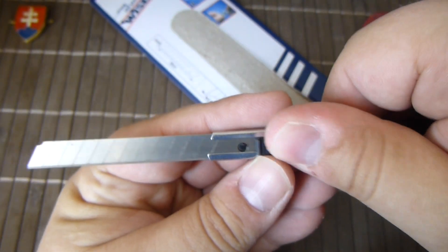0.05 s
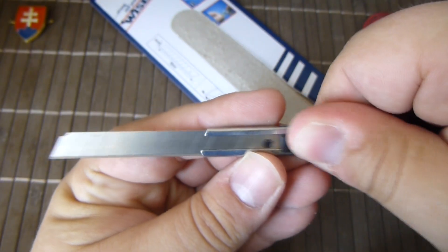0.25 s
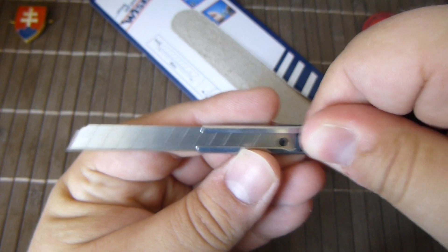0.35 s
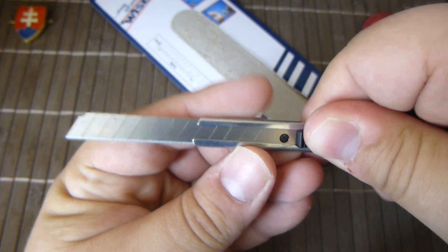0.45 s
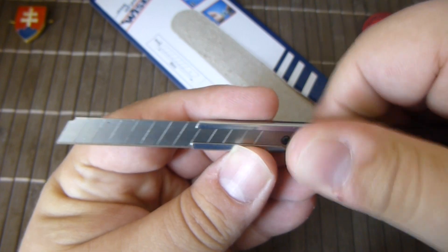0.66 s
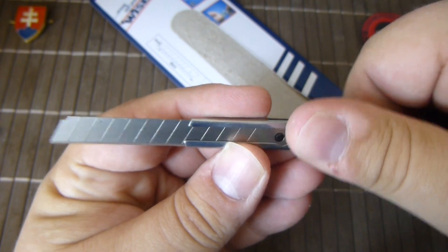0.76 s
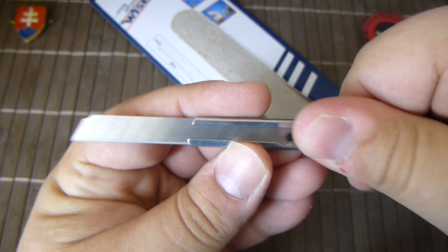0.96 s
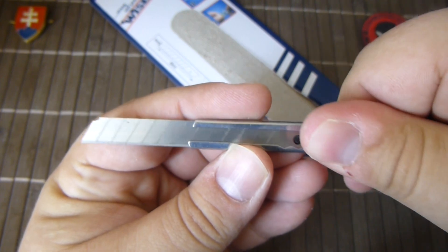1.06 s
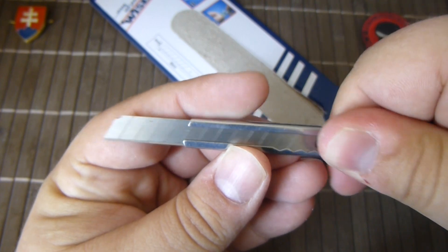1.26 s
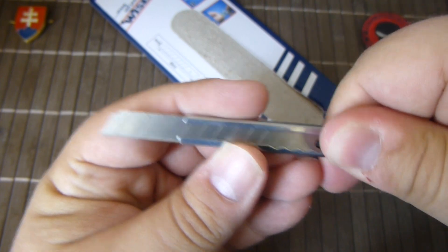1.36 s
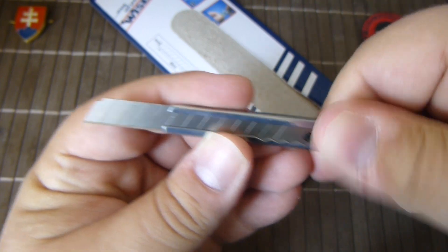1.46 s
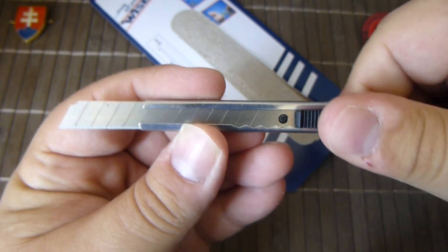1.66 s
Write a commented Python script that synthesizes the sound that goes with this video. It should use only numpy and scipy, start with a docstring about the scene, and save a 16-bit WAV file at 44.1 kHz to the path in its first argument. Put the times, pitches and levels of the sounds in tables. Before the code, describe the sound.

A utility knife blade is drawn back, clicking close to the microphone. After a light tick, four sharp snaps come between 0.2 and 0.5 seconds, each ringing briefly like thin steel and slightly overloading. Following a pause, three more land from about 1.05 to 1.3 seconds, then a soft settling tap. The blade scrapes and squeaks faintly during both runs, over a small room's low rumble and hum.

```python
"""Utility knife drawn back

A thumb draws back the slider of a snap-off knife, close to the microphone in a small room.
Its spring drops into seven notches, four then three; each snap rings the steel sleeve and blade
and overloads the microphone. The blade scrapes and squeaks faintly, over low room rumble and hum."""
import sys
import numpy as np
from scipy import signal
from scipy.fft import rfft, irfft
from scipy.io import wavfile
from scipy.ndimage import uniform_filter1d

SR = 44100
rng = np.random.default_rng(int(sys.argv[2]) if len(sys.argv) > 2 else 0)


def inscribe(sig):
    """Save sig as 16-bit PCM at rate SR to the path in sys.argv[1].

    A 1-D sig is mono; a 2-D sig holds one channel per row.
    Samples are clipped to [-1, 1] before scaling.
    """
    pcm = np.round(np.clip(np.atleast_2d(sig).T, -1, 1) * 32767)
    wavfile.write(sys.argv[1], SR, pcm.astype(np.int16))


N = 74970

# Room noise: spectrum, treble roll-off, side-channel gain. Each row: frequency in Hz, gain in dB.
AIR_SPECTRUM = [(15, -56.5), (25, -17), (69, -13), (86, -26.5), (101, -12), (122, -1.5), (156, -14),
                (209, 0), (313, -3.5), (368, -7), (399, -13), (537, -9.5), (871, -13.5), (1140, -18),
                (1710, -20), (2230, -27), (15500, -36.5)]
AIR_ROLLOFF = [(15500, 3), (16300, -19)]
AIR_SIDE_GAIN = [(30, -6.5), (120, -12), (280, -12), (600, -5), (1200, 0.5), (4000, -1), (15000, -8)]
# Room noise envelope. Each row: time in seconds, level in dB.
AIR_ENVELOPE = [(0, -55.5), (.4, -56.5), (.8, -58.5), (1.25, -59), (1.7, -61.5)]
# Near surfaces. Each row: delay in seconds, gain in dB.
REFLECTIONS = [(.006, -30), (.0095, -26), (0.0211, -33)]
# Reverb colour and treble roll-off. Each row: frequency in Hz, gain in dB.
REVERB_SPECTRUM = [(2000, 5.5), (6000, -1), (9500, -3.5), (13000, -3), (15000, -2.5)]
REVERB_ROLLOFF = [(15200, 0), (16600, -25)]
# Blade squeaks. Each row: centre in seconds, length in seconds, frequency in Hz, level in dB.
BLADE_SQUEAKS = [(.095, .07, 4400, -71.5), (.18, .045, 7340, -64), (0.409, .1, 3820, -57.5),
                 (1.145, 0.045, 7070, -70), (1.25, .06, 5460, -69), (1.295, .06, 3290, -68)]
# Blade travel. Each row: start in seconds, end in seconds, level in dB.
BLADE_SLIDES = [(.09, 0.22, -55), (0.322, 0.456, -54), (0.952, 1.068, -57), (1.15, 1.314, -56)]
# Scrape and settling-tap resonances. Each row: frequency in Hz, width in Hz, gain in dB.
SCRAPE_MODES = [(3193, 680, -1.5), (3790, 290, 3.5), (5800, 340, 2), (7500, 790, 0), (9300, 2200, -9),
                (12480, 3500, -11)]
SETTLE_MODES = [(1970, 120, 0), (2800, 400, -11), (4700, 200, -9), (5825, 200, -4)]
# Light slider catches. Each row: start in seconds, level in dB, treble gain in dB.
CATCHES = [(.120, -39, 0), (0.138, -28.5, 3.5), (0.572, -36, -28), (0.996, -40, 3), (1.011, -37.5, 4)]
# Slider catch, handle knock, plastic clack. Each row: frequency in Hz, gain in dB.
CATCH_SPECTRUM = [(1500, -27), (4000, -11), (6500, 6), (9000, 1.5), (15000, -13.5), (17000, -26.5)]
KNOCK_SPECTRUM = [(60, -24), (150, -9.5), (250, 0.5), (450, 5), (700, -5.5), (1100, -36), (2500, -31)]
CLACK_SPECTRUM = [(100, -12.5), (500, -1.5), (1200, -14.5), (3000, -1), (9000, 11), (14500, 1),
                  (17500, -11)]
# Sleeve and blade. Each row: frequency in Hz, width in Hz, gain in dB with blade out, with blade in.
STEEL_MODES = [(1864, 180, -12.5, -4), (2177, 89, -3.5, -3.5), (2850, 260, 2, -15), (3203, 160, -1, 10.5),
               (3754, 230, 4.5, 0), (4700, 200, 7, 6.5), (5261, 267, 12.5, 9), (5960, 400, 10, 5),
               (6543, 190, 14, 3.5), (7470, 1100, 10, 4.5), (8430, 240, 15, 10.5), (9006, 390, 20, 23),
               (9580, 420, 17.5, 19), (10530, 280, 18.5, 17), (10970, 83, 17.5, 15), (11460, 350, 19, 18),
               (12140, 420, 11.5, 16.5), (13500, 1200, 12, 11.5), (13540, 1700, 10.5, 4),
               (14170, 400, 4.5, 10.5), (16400, 110, 10, 3.5)]
# Notch snaps. Each row: start in seconds, level in dB, blade retraction from 0 to 1, trims in dB for
# knock, clack and the low, middle, ring and top bands, rebound delay in seconds, rebound gain in dB,
# rattle trim in dB, room send in dB.
NOTCHES = [(.2164, 1.5, 0.26, -0.5, -12.5, -0.5, 4.5, -3, -3, .0011, -3.5, -4.5, 0),
           (0.3172, 0, 0.03, -4, -16, -2, -1, 5, -4, .0005, -4.5, -3, 2.5),
           (0.3727, 1, 0.1, -22, -12, 0, -1, -1.5, -1.5, .0007, -7, -2.5, 0),
           (.4518, -1, .0, -39, -12, 4, -1, 0.5, 0.5, .0006, -10, 0, 1.5),
           (1.0531, -3, 1, -9, -5, -8, 1, 0, 6, .0005, 0.5, 3, 2.5),
           (1.2058, -2, 0.89, -13, -19.5, 0.5, -0.5, 1.5, -4, .0004, -2, 0.5, 1.5),
           (1.3127, 0.5, 0.99, -18, -14.5, -1.5, -1.5, -5.5, 3, .0006, -4, -2, 3)]

LOW_HZ, MIDDLE_HZ, RING_HZ, TOP_HZ = 3000, 6000, 9150, 13600
LOW_OCT, MIDDLE_OCT, RING_OCT, TOP_OCT = 0.48, 0.81, 0.083, 0.062
CRACK_DECAY_S, RATTLE_DECAY_S, KNOCK_DECAY_S, TICK_DECAY_S = 0.00057, 0.0021, 0.0024, 0.0069
RATTLE_BASE_DB, KNOCK_BASE_DB = -3.5, -0.5
CHATTER_SIDE = 0.42


def undb(db):
    """Decibels to gain."""
    return 10 ** (np.asarray(db) / 20)


def bin_hz():
    """FFT bin frequencies, offset 1 Hz to keep logs finite."""
    return np.arange(N // 2 + 1) * SR / N + 1


def curve(points):
    """Gain per bin from (Hz, dB) points."""
    hz, db = np.array(points, float).T
    return undb(np.interp(np.log(bin_hz()), np.log(hz), db))


def resonances(modes):
    """Gain per bin of steep-sided (Hz, width in Hz, dB) peaks."""
    freq_hz = bin_hz()
    peaks = (undb(db) / (1 + 2 * ((freq_hz - hz) / width_hz) ** 2) for hz, width_hz, db in modes)
    return np.sqrt(sum(peak ** 2 for peak in peaks))


def colour(x, gain):
    """Minimum-phase filter with the given gain per bin."""
    cepstrum = irfft(np.log(gain), N)
    cepstrum[1:N // 2] *= 2
    cepstrum[N // 2 + 1:] = 0
    return irfft(rfft(x) * np.exp(rfft(cepstrum)), N)


def whiten(x, smooth_hz=161.2):
    """Flatten the smoothed spectrum."""
    power = uniform_filter1d(np.abs(rfft(x)) ** 2, size=int(smooth_hz * N / SR) + 1)
    return colour(x, 1 / np.sqrt(np.abs(power) + 1e-9))


def delay(x, delay_s):
    """Shift later, keeping N samples."""
    shift = int(np.clip(round(delay_s * SR), 0, N - 1))
    return np.concatenate([np.zeros(x.shape[:-1] + (shift,)), x[..., :N - shift]], axis=-1)


def antiphase(x):
    """Stereo side signal: plus left, minus right."""
    return x * np.array([[1], [-1]])


def burst(decay_s):
    """Decaying noise of unit energy."""
    x = rng.standard_normal(N) * np.exp(-np.arange(N) / SR / decay_s)
    return x / np.sqrt(np.sum(x ** 2))


def impact(decay_s):
    """Brief rough contact with a flat spectrum."""
    return whiten(burst(decay_s))


def background(hum_hz=121, hum_db=-73):
    """Room rumble, thin hiss and mains hum."""
    t = np.arange(N) / SR
    mid, side = colour(rng.standard_normal((2, N)), curve(AIR_SPECTRUM) * curve(AIR_ROLLOFF))
    air = (mid + antiphase(colour(side, curve(AIR_SIDE_GAIN)))) / np.std(mid)
    envelope = undb(np.interp(t, *np.array(AIR_ENVELOPE).T))
    return air * envelope + undb(hum_db) * np.sin(2 * np.pi * hum_hz * t)


def room(x, early_db=-18, early_t60_s=0.055, late_db=-21, late_t60_s=0.15, predelay_s=0.0034, side=0.45):
    """Echoes off near surfaces and a short two-slope tail."""
    tail = np.zeros((2, N))
    for db, t60_s in ((early_db, early_t60_s), (late_db, late_t60_s)):
        decay_s = t60_s / np.log(1000)
        tail += undb(db) * (impact(decay_s) + side * antiphase(burst(decay_s)))
    reverb = signal.fftconvolve(x[None], delay(tail, predelay_s), axes=1)[:, :N]
    echoes = sum(undb(db) * delay(x, delay_s) for delay_s, db in REFLECTIONS)
    return colour(reverb + echoes, curve(REVERB_SPECTRUM) * curve(REVERB_ROLLOFF))


def friction(spread_db=3.5, grain_samples=100):
    """Stick and slip: noise with a random level per grain."""
    grain_db = spread_db * rng.standard_normal(N // grain_samples + 1)
    return undb(np.repeat(grain_db, grain_samples)[:N]) * rng.standard_normal(N)


def squeaks(width_hz=650):
    """Friction briefly holds one blade resonance."""
    t, out = np.arange(N) / SR, np.zeros(N)
    for centre_s, length_s, hz, db in BLADE_SQUEAKS:
        tone = colour(friction(), resonances([(hz, width_hz, 0)]))
        envelope = np.exp(-(2 * (t - centre_s) / length_s) ** 4)
        out += undb(db) * envelope * tone / np.std(tone)
    return out


def scrape(release_s=0.01):
    """Blade friction swells as the thumb pushes."""
    t = np.arange(N) / SR
    push = sum(undb(db) * np.sqrt(np.interp(t, [start_s, end_s, end_s + release_s], [0, 1, 0]))
               for start_s, end_s, db in BLADE_SLIDES)
    return colour(push * friction(), resonances(SCRAPE_MODES))


def catches():
    """The slider catches lightly and ticks."""
    out = np.zeros((2, N))
    for start_s, db, treble_db in CATCHES:
        contact = burst(TICK_DECAY_S) + CHATTER_SIDE * antiphase(burst(TICK_DECAY_S))
        spectrum = curve(CATCH_SPECTRUM) * curve([(5000, 0), (14000, treble_db)])
        out += undb(db) * colour(delay(contact, start_s), spectrum)
    return out


def settling_tap(start_s=1.366, gain_db=-18):
    """The slider settles with a soft tap."""
    tap = colour(impact(TICK_DECAY_S), resonances(SETTLE_MODES))
    return undb(gain_db) * delay(tap, start_s)


def steel_response(retraction, band_db, scatter_db=1.5):
    """Sleeve and blade modes: gains follow blade position and vary per strike."""
    offsets_db = scatter_db * rng.standard_normal(len(STEEL_MODES))
    modes = [(hz, width_hz, out_db + retraction * (in_db - out_db) + offset_db)
             for (hz, width_hz, out_db, in_db), offset_db in zip(STEEL_MODES, offsets_db)]
    bands = (LOW_HZ, LOW_OCT), (MIDDLE_HZ, MIDDLE_OCT), (RING_HZ, RING_OCT), (TOP_HZ, TOP_OCT)
    trim_db = sum(db * np.exp(-(np.log2(bin_hz() / hz) / width_oct) ** 2)
                  for db, (hz, width_oct) in zip(band_db, bands))
    return resonances(modes) * undb(trim_db)


def diffuse(gain, blur_hz=1398, share=0.44):
    """Summed over all directions, resonances partly blur."""
    blurred_power = uniform_filter1d(gain ** 2, size=int(blur_hz * N / SR) + 1)
    return np.sqrt(share * blurred_power + (1 - share) * gain ** 2)


def snaps():
    """The spring hits each notch and rebounds; steel rattles and rings, slider clacks, handle knocks."""
    direct, room_send = np.zeros((2, N)), np.zeros(N)
    for (start_s, db, retraction, knock_db, clack_db, *band_db,
         rebound_s, rebound_db, rattle_db, send_db) in NOTCHES:
        crack = impact(CRACK_DECAY_S)
        rebound = undb(rebound_db) * delay(burst(CRACK_DECAY_S), rebound_s)
        rattle_gain = undb(RATTLE_BASE_DB + rattle_db)
        force = whiten(crack + rebound + rattle_gain * burst(RATTLE_DECAY_S))
        side = CHATTER_SIDE * rattle_gain * antiphase(burst(RATTLE_DECAY_S))
        body = np.hypot(steel_response(retraction, band_db), undb(clack_db) * curve(CLACK_SPECTRUM))
        knock = undb(KNOCK_BASE_DB + knock_db) * colour(impact(KNOCK_DECAY_S), curve(KNOCK_SPECTRUM))
        direct += delay(undb(db) * colour(force + side, body) + knock, start_s)
        room_send += delay(undb(db + send_db) * colour(force, diffuse(body)) + knock, start_s)
    return direct, room_send


def scene(right_bias_db=1.6):
    """The knife, slightly right, in a quiet room."""
    direct, room_send = snaps()
    knife = direct + scrape() + catches() + settling_tap() + squeaks()
    pan = undb(antiphase(-right_bias_db / 2))
    return knife * pan + room(room_send) + background()


def record(dry):
    """Microphone overload: clip at 2x oversampling, then low-pass."""
    clip_level, cutoff_hz = 0.85, 16800
    clipped = np.clip(signal.resample_poly(dry, 2, 1, axis=1), -clip_level, clip_level)
    lowpass = signal.butter(14, cutoff_hz, fs=SR, output="sos")
    return signal.sosfilt(lowpass, signal.resample_poly(clipped, 1, 2, axis=1))


dry = scene()
out = record(dry)
inscribe(out)
```